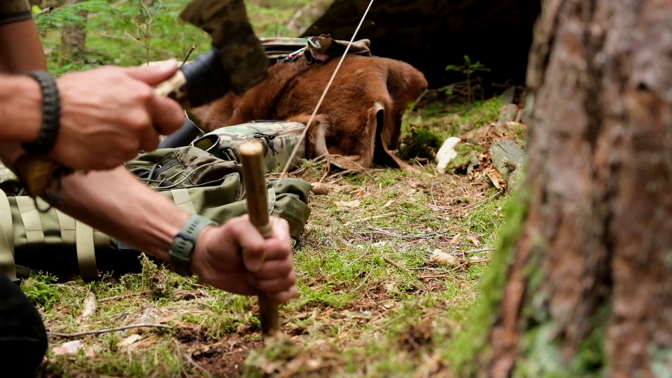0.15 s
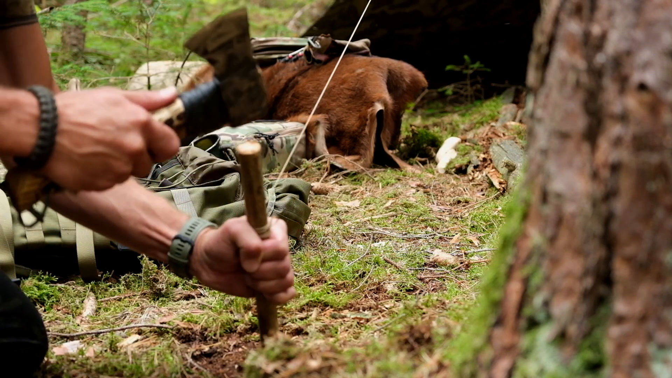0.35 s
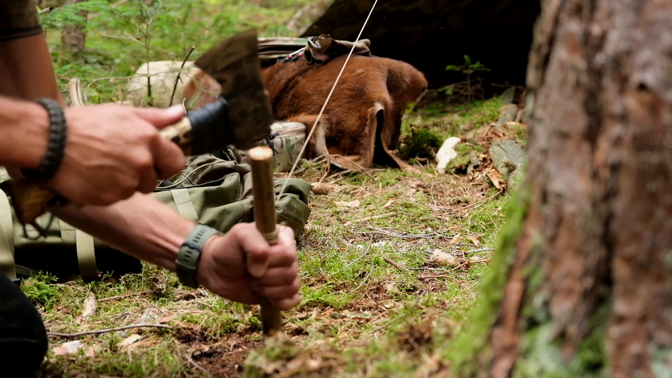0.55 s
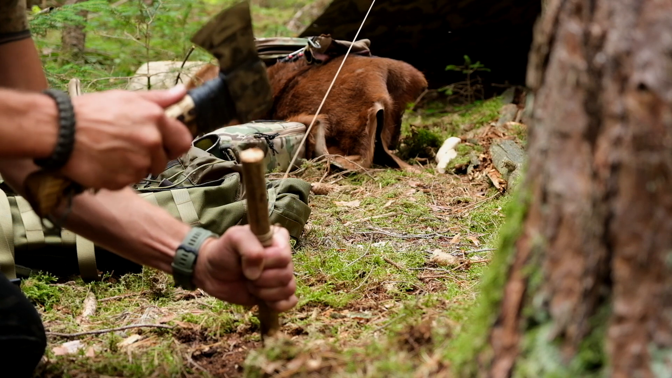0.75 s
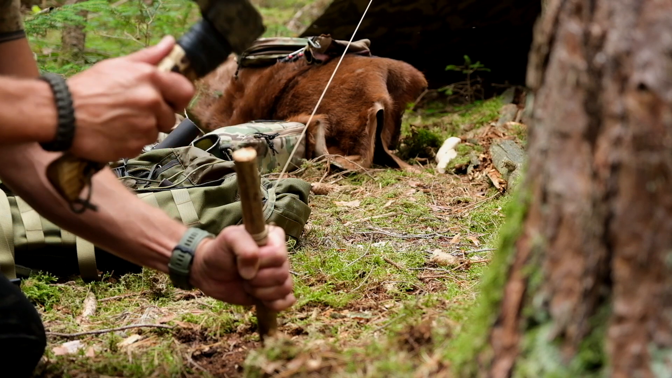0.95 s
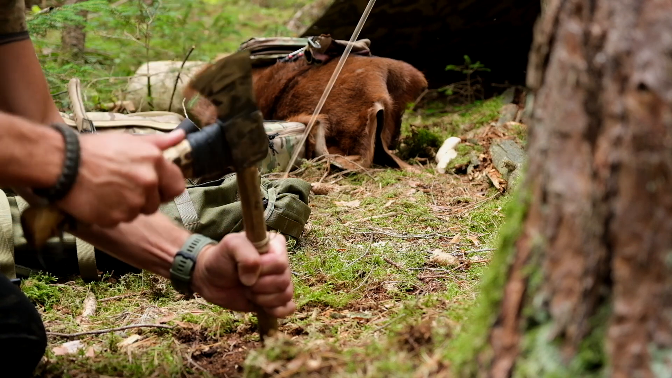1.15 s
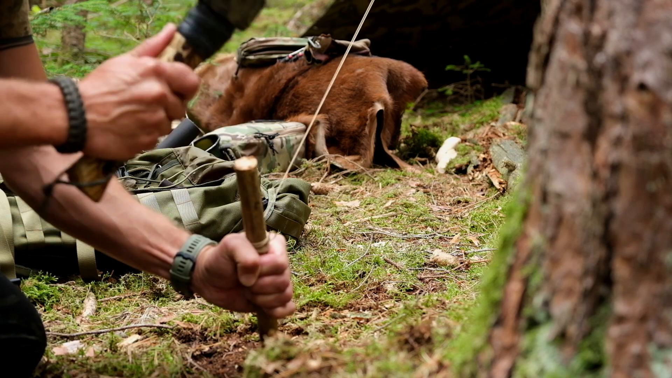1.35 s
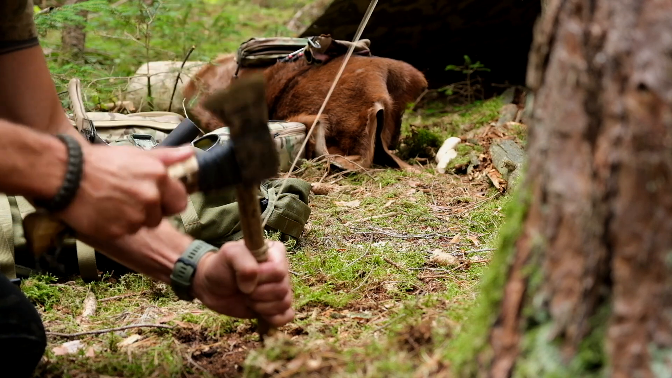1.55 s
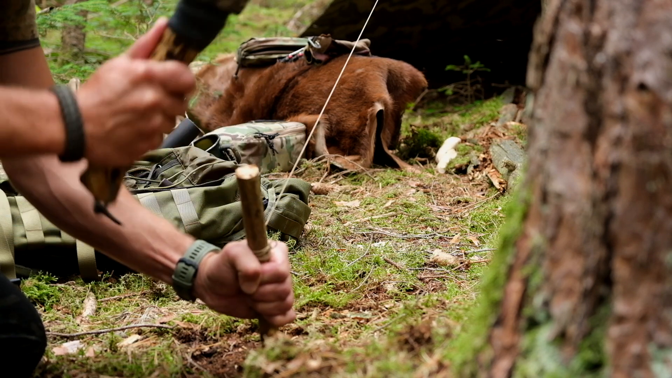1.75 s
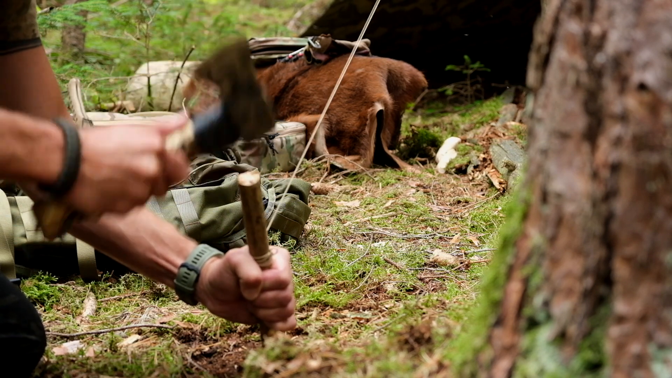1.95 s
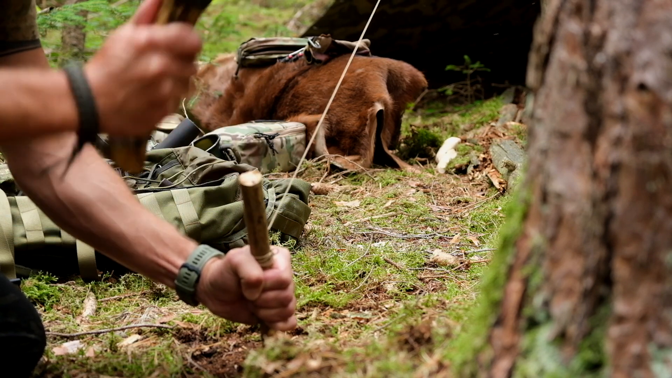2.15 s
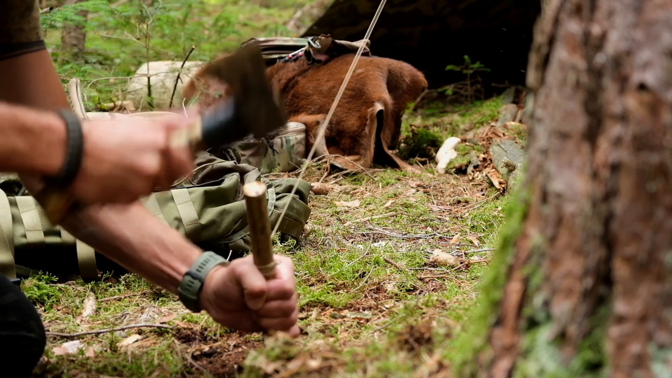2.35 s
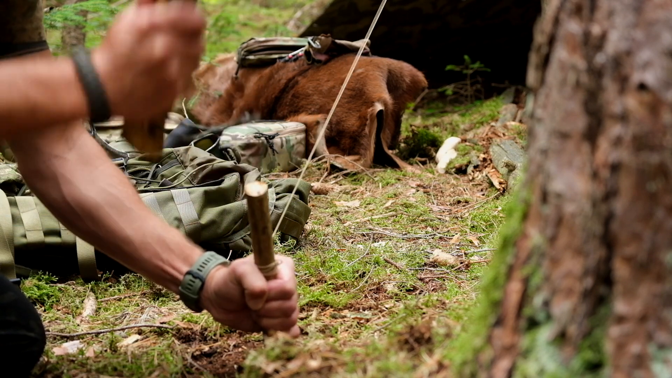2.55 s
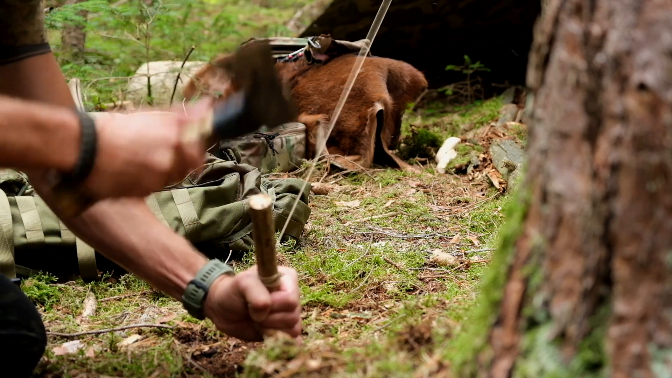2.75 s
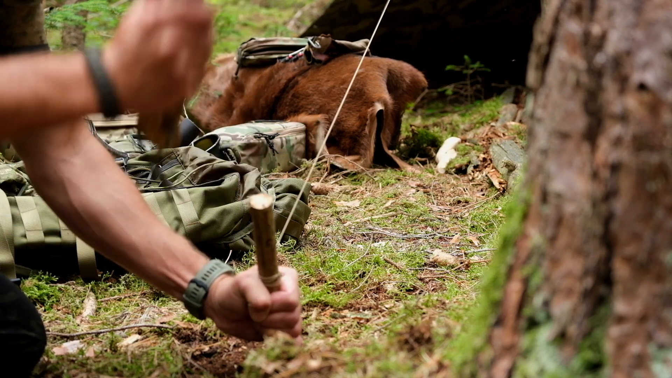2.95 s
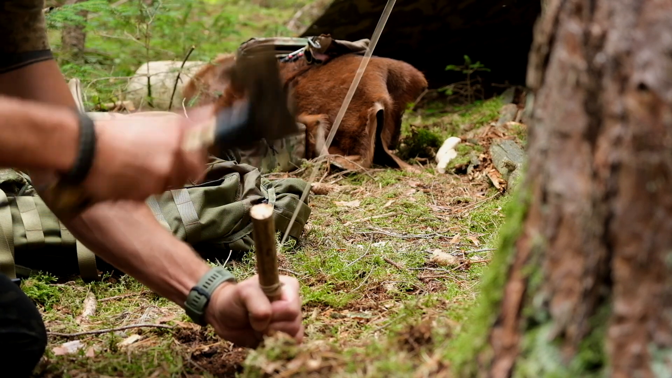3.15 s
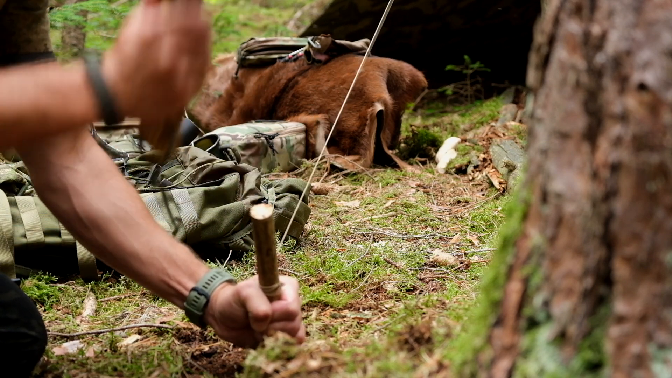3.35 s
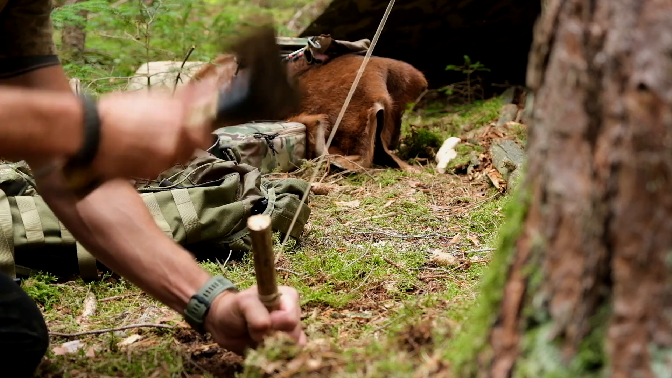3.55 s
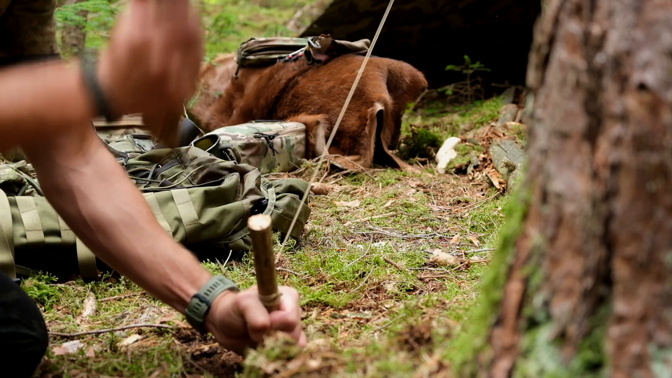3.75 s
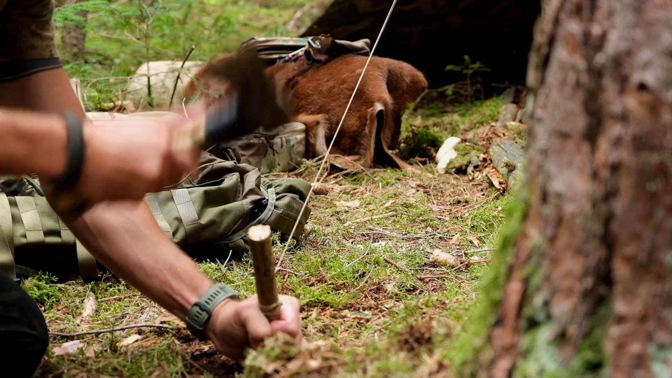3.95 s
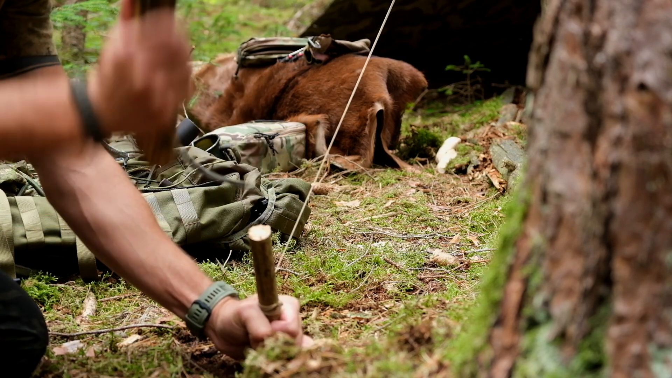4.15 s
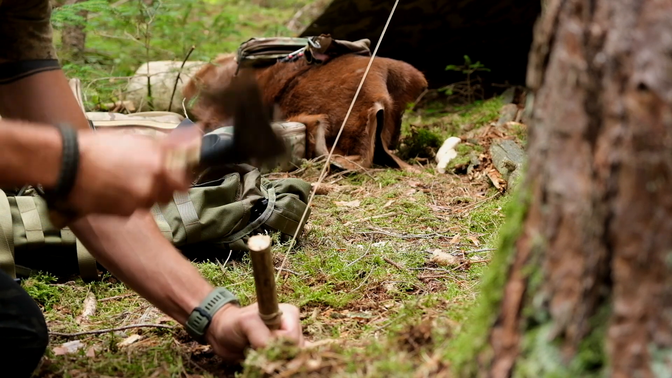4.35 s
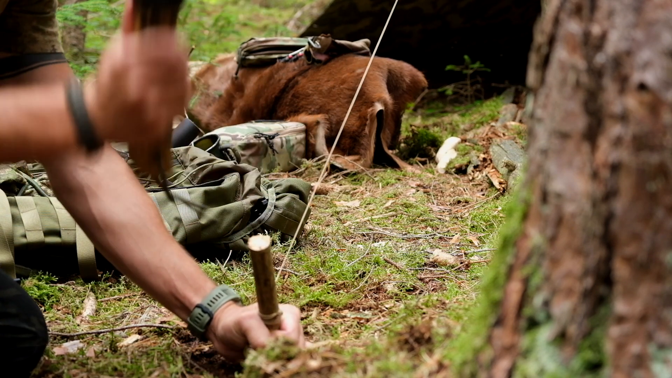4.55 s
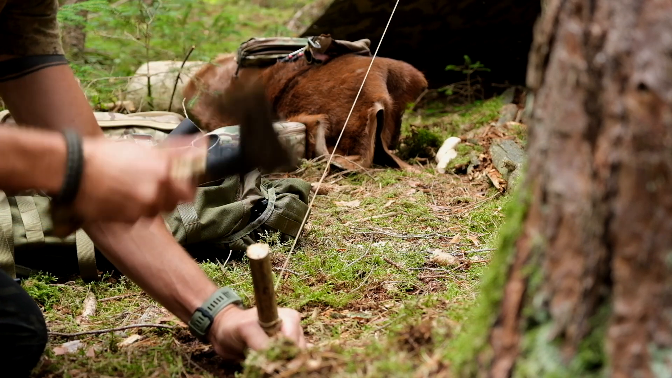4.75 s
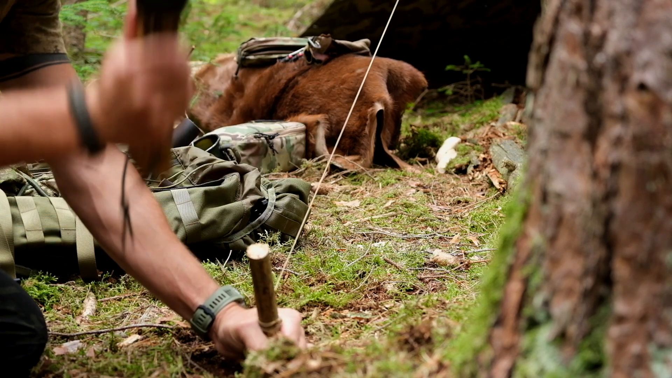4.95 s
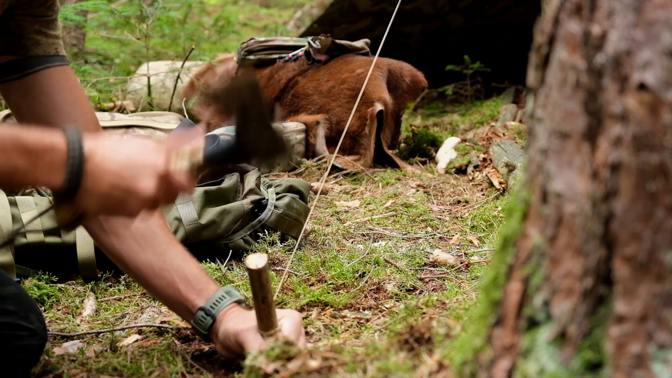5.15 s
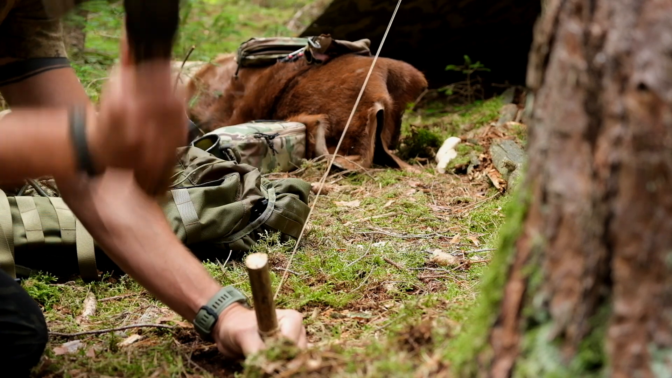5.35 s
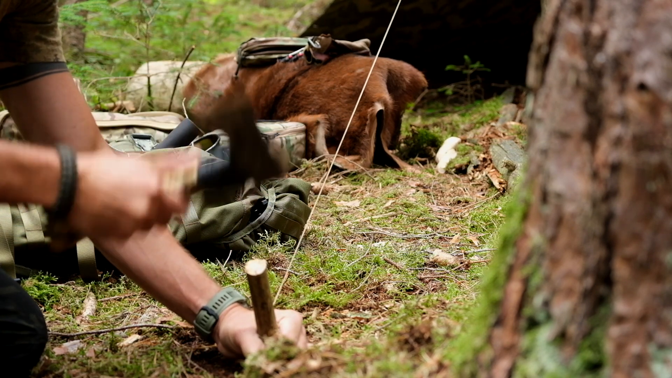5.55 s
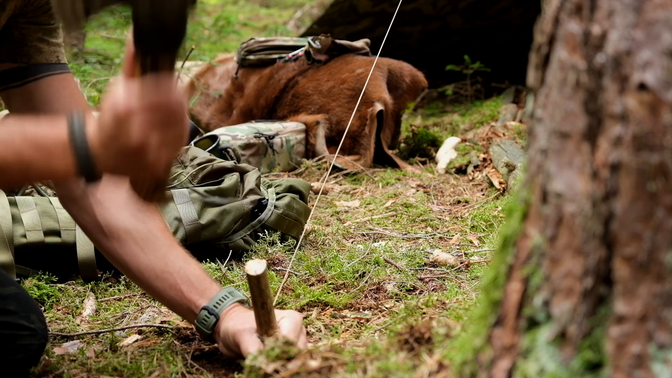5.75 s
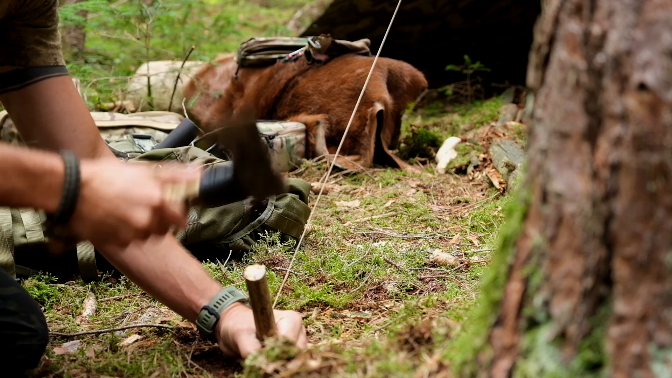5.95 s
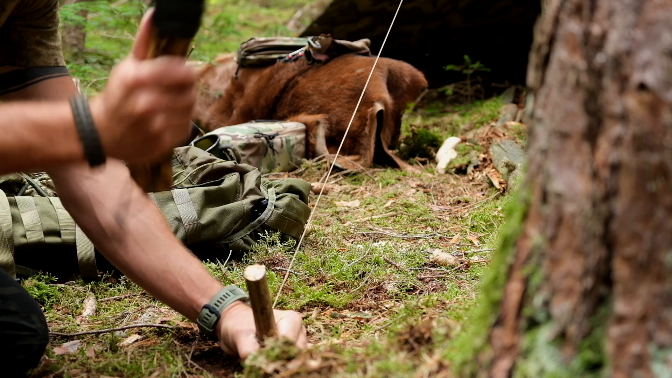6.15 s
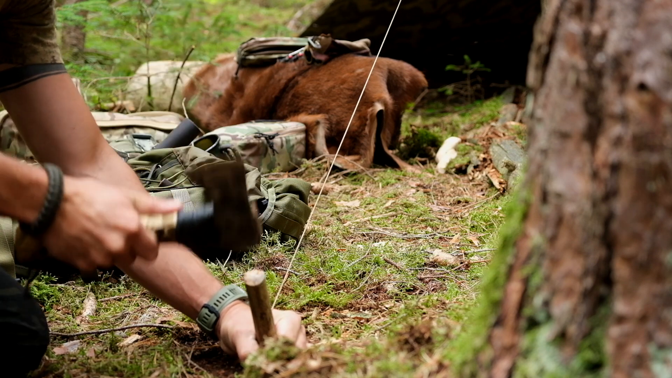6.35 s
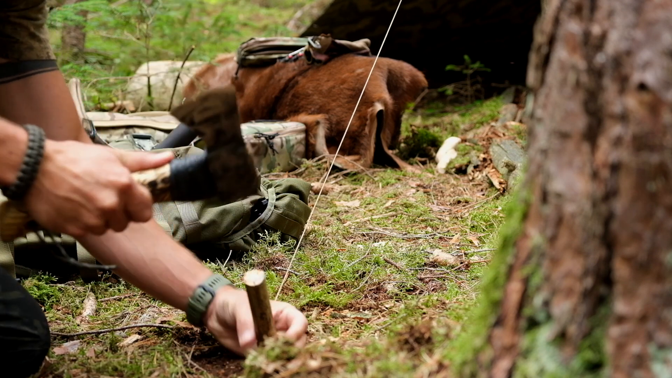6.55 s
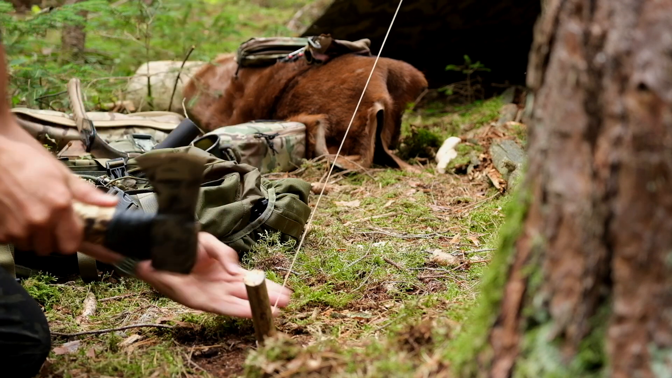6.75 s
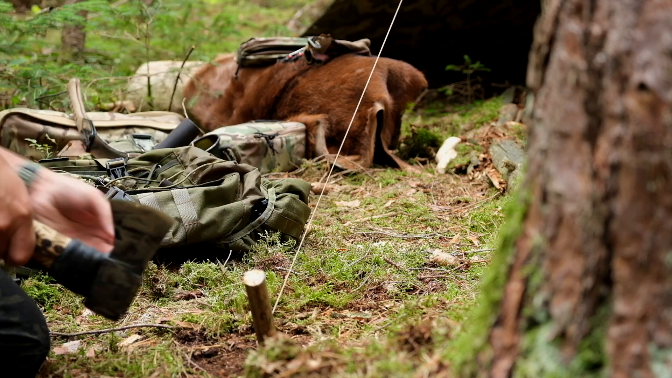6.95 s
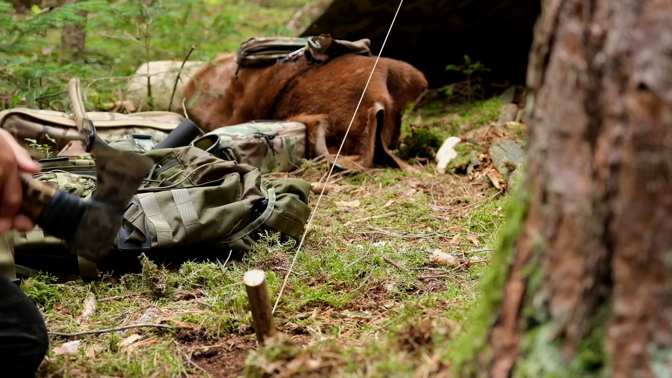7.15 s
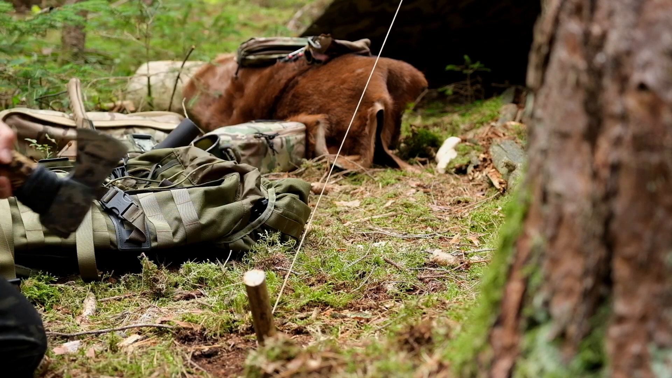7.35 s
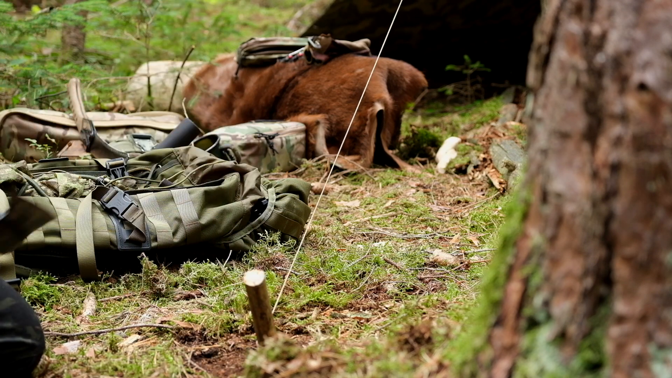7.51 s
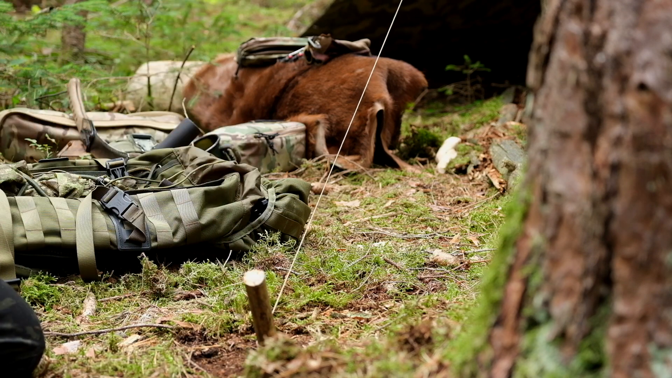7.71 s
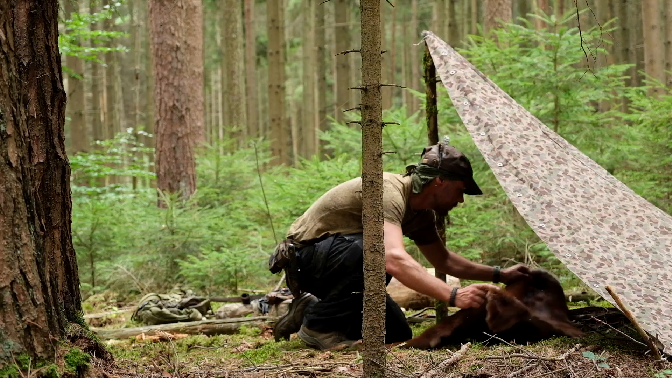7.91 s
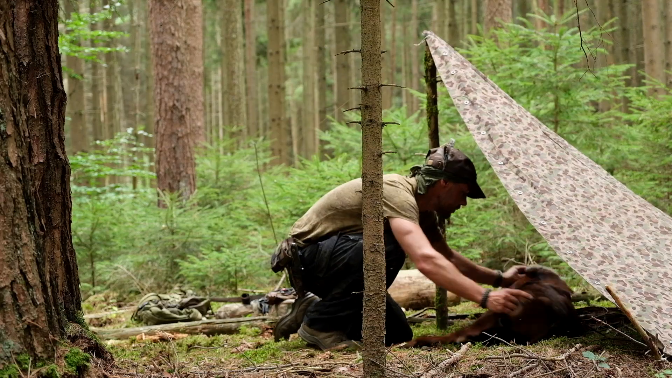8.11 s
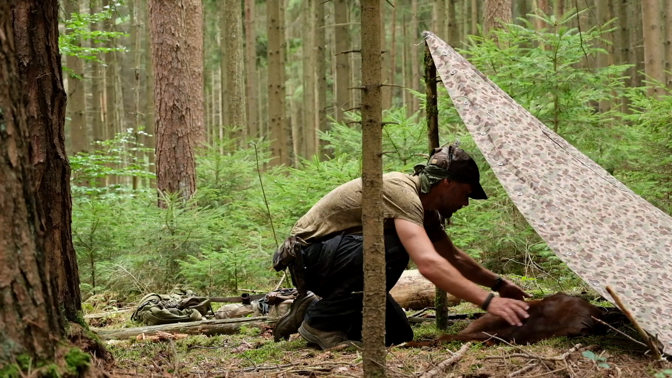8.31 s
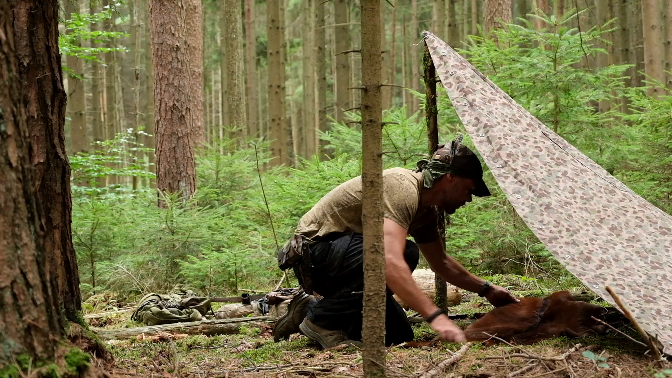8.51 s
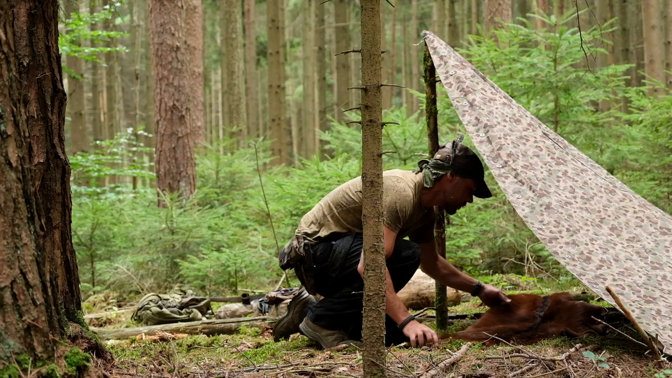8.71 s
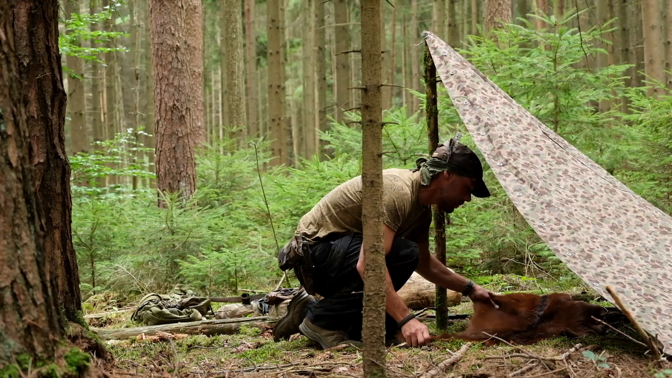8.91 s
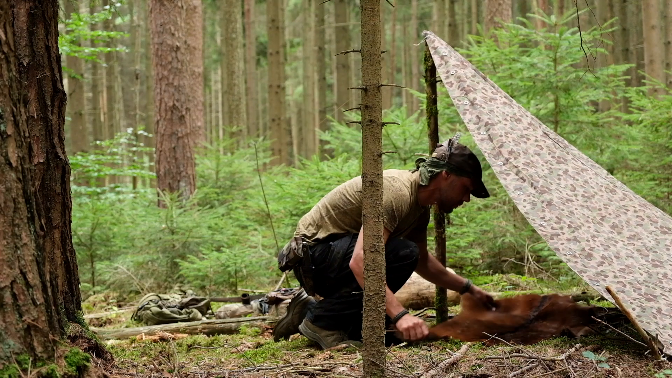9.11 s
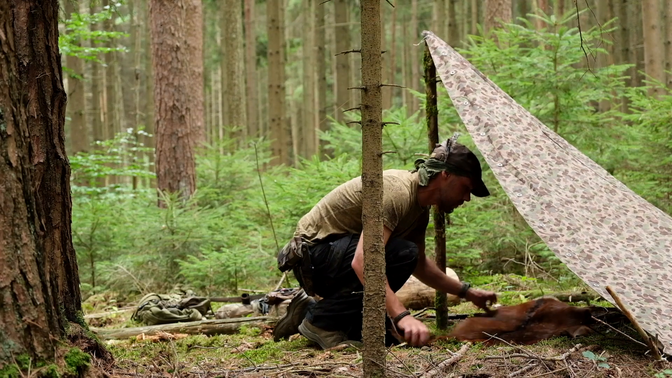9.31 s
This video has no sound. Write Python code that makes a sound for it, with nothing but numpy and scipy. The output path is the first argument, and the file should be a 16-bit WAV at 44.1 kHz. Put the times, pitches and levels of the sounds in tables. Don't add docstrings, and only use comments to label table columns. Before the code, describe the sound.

A still forest clearing: low air rumble, soft hiss, and small high birds chirping far away over a blurred chorus, with a tiny twig tick or two. At about 1.2 and 1.5 seconds the back of a hatchet taps a wooden stake, more lightly and dully. From 1.9 to 6.3 seconds twelve hard blows follow, evenly spaced about 0.4 seconds apart. Each is a very close, dry wooden crack sweeping quickly downward, with a short steel ring and a low thud of soft soil, overloading the microphone and slapping back from nearby trunks. Faint bounces follow a few blows, the last near 6.4. Then quiet returns: thin chirps and short flourishes, slight cloth rustles around 6.6, 7.3 and 8.0, little wind puffs near 8.0 and 8.8, and a distant road hum rising from about 7.8 until the end around 9.4.

```python
import sys
import numpy as np
from scipy import signal
from scipy.fft import rfft, irfft
from scipy.io import wavfile
from scipy.ndimage import uniform_filter1d

SR = 44100
rng = np.random.default_rng(int(sys.argv[2]) if len(sys.argv) > 2 else 0)


def volts(x):
    e = np.asarray(x, float) / 20
    return 10 ** e


def generate_wav(signal):
    frames = np.transpose(np.atleast_2d(signal))
    scaled = np.clip(frames, -1, 1) * 32767
    pcm = np.round(scaled).astype(np.int16)
    wavfile.write(sys.argv[1], SR, pcm)


N = 413658

# pitch_hz, level_db (per Hz)
AIR_SPECTRUM = [(12, -24), (20, 6.5), (113, -9), (216, -6), (301, -10.5), (446, -15.5), (698, -20),
                (1190, -22), (2390, -21.5), (4420, -12.5), (8890, -24.5), (14700, -28.5), (16000, -28.5)]
# pitch_hz, likeness (0 to 1)
STEREO_LIKENESS = [(60, 0.97), (180, 1), (550, 0.83), (1650, 0.66), (4970, 0.67), (15000, 0.1)]
# time_s, level_db
ROAD_LEVEL = [(0, -78), (7.75, -66.5), (7.95, -60), (8.6, -60), (9.38, -58.5)]

# middle_s, level_db, half_length_s
CHORUS_SWELLS = [(0.0, -54, 1), (.95, -67, 0.14), (1.623, -52, 0.21), (2.946, -66, 0.99),
                 (4.002, -52.5, .35), (4.72, -54.5, 0.14), (5.618, -46.5, 0.13), (6.53, -49.5, 0.17),
                 (7.21, -47, 0.092), (7.848, -48.5, .22), (8.576, -57, 0.22), (9.38, -53.5, 0.092)]
HOOK_SHAPE = (.92, .98)
FALL_SHAPE = (1.09, .9)
FLICK_SHAPE = (.85, 1.17)
LEVEL_SHAPE = (1.005, .985)
DIP_SHAPE = (1.05, 1.09)
RISE_SHAPE = (.94, 1.03)
TICK_SHAPE = (1.08, .985)
# start_s, length_s, middle_hz, level_db
HOOKED_NOTES = [(0.0, .033, 5170, -53.5), (0.452, 0.043, 4780, -60), (0.75, 0.067, 5070, -62),
                (0.936, 0.0597, 4790, -63), (1.763, 0.0416, 5204, -54), (2.226, .078, 4345, -64.5),
                (2.862, 0.032, 5000, -57.5), (4.053, 0.032, 4430, -48.5), (5.393, 0.0571, 4930, -52.5),
                (5.642, .06, 2970, -53.5), (6.416, .05, 4653, -51.5), (7.593, .053, 4910, -57.5),
                (8.548, 0.0604, 4925, -53.5)]
# start_s, length_s, middle_hz, level_db
FALLING_NOTES = [(.236, .075, 3764, -55.5), (.285, 0.12, 3057, -52.5), (.8, 0.065, 3800, -60.5),
                 (2.507, 0.066, 5600, -62), (3.63, .03, 5960, -58.5), (4.09, 0.058, 3866, -59),
                 (6.057, 0.085, 2940, -60), (7.72, 0.075, 4030, -60.5), (8.922, .071, 6050, -50.5),
                 (8.99, 0.075, 4807, -61), (9.12, 0.061, 5620, -62.5), (9.305, .074, 3090, -65)]
# start_s, length_s, middle_hz, level_db
FLICKED_NOTES = [
    (1.816, .018, 5900, -54),
    (4.038, .022, 4895, -46.5),
    (9.295, .022, 4940, -52),
]
# start_s, length_s, middle_hz, level_db
HELD_NOTES = [(.138, .058, 4670, -68), (.164, .13, 2490, -56.5), (.22, .022, 5160, -57),
              (.362, 0.024, 7840, -54.5), (1.038, .02, 4720, -59), (2.855, .04, 6383, -55.5),
              (2.92, .1, 4920, -59.5), (2.927, 0.12, 5760, -61.5), (3.598, .02, 3610, -56.5),
              (5.79, .064, 5330, -57.5), (6.215, .11, 2570, -65), (6.651, .093, 3140, -65.5),
              (7.14, .043, 5230, -58.5), (7.208, 0.0495, 5360, -52.5), (7.26, 0.087, 2086, -65),
              (8.424, 0.054, 2890, -66.5), (8.7, 0.068, 7820, -56.5), (9.174, .085, 4640, -61),
              (9.195, .095, 2470, -64), (9.315, 0.046, 5350, -60.5)]
# start_s, length_s, middle_hz, level_db
RISING_NOTES = [
    (4.857, .051, 7800, -56.5),
    (4.953, 0.057, 6004, -49.5),
    (7.065, .037, 6300, -60.5),
]
# after_s, length_s, middle_hz, level_db
FLOURISH_PARTS = [
    (0, 0.029, 4340, 0.5),
    (.03, 0.025, 3248, 1),
    (0.069, .04, 3111, -1),
]
# start_s, level_db, pitch_factor
FLOURISHES = [
    (1.831, -54, 1),
    (6.509, -55.5, 1),
    (7.855, -62.5, 1.03),
    (8.672, -51, 1),
]

# start_s, peak_db, pitch_hz, t60_s
TWIGS = [(.049, -26.5, 5400, 0.0092), (.222, -43, 6700, .004), (1.5515, -22, 6060, 0.018),
         (4.545, -41, 700, 0.012), (5.03, -44, 1510, 0.015), (5.4405, -29, 4313, 0.0055),
         (5.873, -45.5, 1070, 0.043), (5.936, -33, 749, 0.0118), (6.094, -46, 550, 0.025),
         (6.52, -48, 599.5, 0.02), (7.845, -49.5, 2000, 0.0057)]
# middle_s, level_db, half_length_s
RUSTLES = [
    (6.6, -58, .035),
    (7.3, -63, .05),
    (8.03, -68, .06),
]
# start_s, level_db, signed_length_s (the sign is the push direction)
WIND_PUFFS = [
    (8.017, -37, -0.0023),
    (8.036, -36, 0.0019),
    (8.112, -35, -0.0034),
    (8.783, -36.5, .003),
]

# delay_s, level_db, smear_s
ECHOES = [
    (0.0164, -17, .0002),
    (.021, -30, .004),
    (0.034, -41, .004),
    (0.0513, -36.5, .0015),
    (0.06, -38.5, .004),
]
# pitch_hz, level_db
ECHO_COLOUR = [(300, -22), (1400, -12), (2800, 1), (4000, -3), (6000, -12), (8000, -11), (15000, -22)]
# pitch_hz, t60_s
WOODS_DECAY = [(150, 0.3), (600, 0.33), (2000, 1), (4500, 0.65), (9000, 0.04), (16000, .2)]
# pitch_hz, level_db
WOODS_COLOUR = [(100, -8), (500, -4.5), (2000, -6), (5000, -9.5), (9000, 12.5), (16000, -3.5)]

CONTACT_TIMES = [1.1886, 1.5434, 1.9199, 2.3138, 2.7101, 3.1084, 3.5008, 3.8988, 4.302, 4.7042, 5.102,
                 5.4958, 5.9033, 6.3228, 2.7485, 3.542, 5.1413, 6.383]
# level_db, stake_hz, hardness_db_per_octave, soil_hz, soil_db
BLOWS = [(-8, 1100, -1, 460, -28), (-6.5, 1100, -3.0, 240, -18), (2, 2120, -3.5, 240, -11.5),
         (4, 2000, 0.23, 205, -10), (4.5, 1920, 1, 240, -9), (6, 2320, -0.37, 260, -7),
         (4.5, 1970, -0.6, 270, -6.5), (6, 2340, -0.38, 245, -10.5), (6, 1900, -0.4, 256, -10.5),
         (4.5, 2230, 0.12, 270, -8), (3.5, 1900, 0.27, 300, -8), (4, 1800, -0.2, 177, -7),
         (4.5, 2030, -0.16, 185, -5.5), (3.5, 2090, 0.83, 175, -8)]
# level_db, stake_hz, hardness_db_per_octave, soil_hz, soil_db
BOUNCES = [
    (-26.5, 1250, -5, 245, -15.5),
    (-36, 2200, -7.5, 274, -14),
    (-22.5, 1680, -1, 236, -13.5),
    (-41, 690, -3, 340, -19.5),
]
# pitch_hz, level_db
KNOCK_SPECTRUM = [(150, -19.5), (500, -17.5), (1100, -5.5), (2000, 1), (3200, 0), (4400, -0.5),
                  (5800, -9.5), (8000, -7.5), (11000, -30.5), (16000, -22)]
# pitch_multiple, level_db, t60_s
STAKE_MODES = [(.23, -22.5, .022), (0.452, -20, .012), (.7, -10, 0.0093), (0.998, -2, 0.0054),
               (1.4, -11, 0.0033), (1.85, -11, 0.0054)]
# pitch_hz, level_db, t60_s
HEAD_MODES = [(2007, -17, 0.027), (2812, -15, 0.026), (4276, -4.5, 0.01), (4630, -13, 0.015),
              (6670, -17.5, 0.012), (8260, -18, 0.021), (10800, -26.5, 0.0046), (13070, -33, 0.01)]
# pitch_hz, level_db, t60_s
SOIL_SWAY = (133, -10.5, .13)


def evened(x):
    return x / np.sqrt(np.mean(x ** 2) + 1e-20)


def read(points, hz):
    f, value = np.transpose(points)
    return np.interp(np.log(hz + 1), np.log(f + 1), value)


def add(mix, start_s, sound):
    part = mix[round(start_s * SR):][:len(sound)]
    part += sound[:len(part)]


def coloured(x, points):
    size = x.shape[-1]
    gain = volts(read(points, np.fft.rfftfreq(size, 1 / SR)))
    return irfft(rfft(x) * gain, size)


def woods_tail(colour, start_s, t60_scale):
    taps = np.zeros((2, SR))
    at = np.arange(round(start_s * SR), SR - 20, 20)
    at = at + rng.integers(0, 20, (2, len(at)))
    np.put_along_axis(taps, at, rng.choice([-1., 1.], at.shape), 1)
    hz, t, z = signal.stft(taps, SR, nperseg=256)
    t60 = t60_scale * read(WOODS_DECAY, hz)[:, None]
    z = z * volts(read(colour, hz)[:, None] - 60 * t / t60)
    out = signal.istft(z, SR, nperseg=256)[1]
    return out / np.linalg.norm(out[0])


def air():
    frames, hz = N // 256 + 5, np.fft.rfftfreq(1024, 1 / SR)
    a, b, c, d, patches = rng.standard_normal((frames, 513, 5)).T
    patches = uniform_filter1d(patches, size=10, axis=0)
    patches = evened(uniform_filter1d(patches, size=16, axis=1))
    same = np.clip(read(STEREO_LIKENESS, hz), -1, 1)[:, None]
    left = a + 1j * b
    right = same * left + np.sqrt(1 - same ** 2) * (c + 1j * d)
    lumpy_db = read([(60, 3.0), (400, 1.4), (3000, .5)], hz)[:, None] * patches
    z = np.array([left, right]) * volts(read(AIR_SPECTRUM, hz)[:, None] + lumpy_db)
    still = signal.istft(z, nperseg=1024, noverlap=768)[1][:, :N]
    return volts(-50.5) * evened(still)


def distant_road():
    road = rng.standard_normal(N) + .3 * rng.standard_normal((2, N))
    road = coloured(road, [(300, -25.5), (600, -4.5), (950, 5.5), (1500, -1.5), (2500, -17.0), (5000, -45.0)])
    time_s, level_db = np.transpose(ROAD_LEVEL)
    return evened(road) * volts(np.interp(np.arange(N) / SR, time_s, level_db))


def whistle(length_s, start_hz, middle_hz, end_hz, level_db):
    u = np.linspace(0, 1, round(length_s * SR) + 2)
    hz = np.polyval(np.polyfit([0, .5, 1], [start_hz, middle_hz, end_hz], deg=2), u)
    trill = .55 if 3110 < middle_hz < 5600 else .2
    hz *= 1 + trill * uniform_filter1d(rng.standard_normal(len(u)), size=150)
    flutter_db = 70 * trill * uniform_filter1d(rng.standard_normal(len(u)), size=200)
    tone = np.sin(2 * np.pi * np.cumsum(hz) / SR)
    return volts(level_db + 6 + flutter_db) * tone * np.sin(np.pi * u) ** 0.44


def bird_chorus():
    chorus, t = np.zeros(N), np.arange(N) / SR
    for s, a, b, c in rng.random((900, 4)):
        hz = 4494 * np.exp(.4 * (a - .5) + .2 * (b - c))
        add(chorus, 9.3 * s, whistle(0.022 + .06 * b, hz, hz * (.95 + 0.089 * c), hz * (0.57 + .25 * c), 4 * c))
    woods = woods_tail([(100, 0.0), (16000, 0)], .002, 0.28)
    chorus = signal.fftconvolve(chorus[None], woods, axes=1)[:, :N]
    swell = volts(-64)
    for middle_s, level_db, half_s in CHORUS_SWELLS:
        swell = swell + volts(level_db) * np.exp(-((t - middle_s) / half_s) ** 2)
    shared = evened(chorus + 0.77 * chorus[::-1])
    return shared * swell * volts(-7.0)


def songbook():
    ticks = [(4.137 + k * .103, .022, 5900, -61.5) for k in range(6)]
    shaped = [(HOOK_SHAPE, HOOKED_NOTES), (FALL_SHAPE, FALLING_NOTES), (FLICK_SHAPE, FLICKED_NOTES),
              (LEVEL_SHAPE, HELD_NOTES), (RISE_SHAPE, RISING_NOTES), (TICK_SHAPE, ticks)]
    for s, db, pitch in FLOURISHES:
        for shape, part in zip((HOOK_SHAPE, DIP_SHAPE, RISE_SHAPE), FLOURISH_PARTS):
            after, length, hz, part_db = part
            shaped.append((shape, [(s + after, length, hz * pitch, db + part_db)]))
    notes = []
    for (start, end), rows in shaped:
        for s, length, hz, db in rows:
            notes.append((s, length, start * hz, hz, end * hz, db))
    return notes


def clear_birds():
    direct, notes = np.zeros((2, N)), songbook()
    for (s, *note), side in zip(notes, rng.uniform(-0.85, 1, len(notes))):
        sound = whistle(*note)
        add(direct[0], s, sound * volts(8.8 * side))
        add(direct[1], s, sound / volts(1.8 * side))
    woods = woods_tail([(2600, -12), (3600, 0), (5600, 0), (6200, -6)], .002, .4)
    blur = signal.fftconvolve(direct.mean(0)[None], woods, axes=1)[:, :N]
    return volts(-0.5) * direct + volts(-6.5) * blur


def twig_ticks():
    out, t = np.zeros(N), np.arange(2000) / SR
    for s, db, hz, t60 in TWIGS:
        snap = coloured(rng.standard_normal(len(t)), [(0.24 * hz, -18), (hz, 0), (1.6 * hz, -10), (9 * hz, -30)])
        add(out, s, volts(db - 1.5 - 60 * t / t60) * evened(snap))
    return out


def cloth_rustle():
    out, t = np.zeros(N), np.arange(N) / SR
    fizz = coloured(rng.standard_normal(N), [(3000, -32), (7000, -1), (11000, -3.5), (16000, -12.0)])
    fizz = evened(fizz)
    for middle_s, db, half_s in RUSTLES:
        out += volts(db) * fizz * np.exp(-((t - middle_s) / half_s) ** 2)
    return out


def wind_puffs():
    out, t = np.zeros(N), np.arange(2000) / SR
    for s, db, length_s in WIND_PUFFS:
        u = t / abs(length_s)
        add(out, s, np.sign(length_s) * volts(db + 8.5) * u * (1 - 0.29 * u) * np.exp(-u))
    return out


def ring(t, hz, level_db, t60, rise_s, phase):
    t = np.maximum(t, 0)
    envelope = volts(level_db - 60 * t / t60) * (1 - np.exp(-t / rise_s))
    return envelope * np.sin(2 * np.pi * (hz * t + phase))


def soil_thud(t, soil_hz, soil_db, luck):
    sway_hz, sway_db, sway_t60 = SOIL_SWAY
    soil = ring(t - .55 / soil_hz, soil_hz, soil_db + 9, 5.62 / soil_hz, 0.83 / soil_hz, 0)
    soil += ring(t - .004, sway_hz * (.92 + 0.13 * luck), soil_db + sway_db, sway_t60, 0.0098, 0)
    crumbs = coloured(rng.standard_normal(len(t)), [(70, -27.5), (150, 11.5), (300, 3.5), (600, -15.5), (1500, -34.5)])
    soil += evened(crumbs) * volts(soil_db - 9.5 - 60 * t / 0.092) * (1 - np.exp(-t / .004))
    return soil


def blow(row, luck):
    blow_db, stake_hz, hardness, soil_hz, soil_db = row
    t, hz = np.arange(8192) / SR, np.fft.rfftfreq(8192, 1 / SR) + 1
    tilt_db = 2.4 * hardness * np.log2(np.maximum(hz / stake_hz, .5))
    contact = volts(read(KNOCK_SPECTRUM, hz * min(2000 / stake_hz, 1.6)) + tilt_db)
    spread = np.clip(0.82 + .12 * hardness, .3, 1.1)
    contact = contact * np.exp(-2j * np.pi * spread * (.18 * np.sqrt(hz) - 0.000822 * hz))
    returned = np.clip(.55 + .14 * hardness, .1, .7)
    trips = 1 / (1 + returned * np.exp(-1j * np.pi * hz / stake_hz))
    sweep, single = irfft(contact * np.array([trips, 1 + 0 * hz])) * (t < .03)
    splinter = evened(irfft(rfft(rng.standard_normal(len(t))) * abs(contact)))
    pressed = volts(-0.5 + 2.2 * min(hardness + 1, 0)) * np.exp(-(t / 0.0017) ** 4)
    splinter *= (pressed + volts(-10.5 - 60 * t / 0.025)) * (1 - np.exp(-t / 0.00014))
    knock = volts(7) * sweep / abs(sweep).max() + splinter
    outward = volts(8.0) * single / abs(single).max() + 0.19 * splinter
    modes = [(k * stake_hz, db, t60) for k, db, t60 in STAKE_MODES] + HEAD_MODES
    for (mode_hz, db, t60), (a, b, c) in zip(modes, luck):
        late_s = max(0.0633 / np.sqrt(mode_hz) - .0006, 0)
        mode_db = db + 3.0 + 0.78 * hardness * np.log2(mode_hz / stake_hz) + 5.7 * (a - .5)
        knock += ring(t - late_s, mode_hz * (1 + 0.011 * (b - .5)), mode_db, t60, 0.000067, c)
    soil = soil_thud(t, soil_hz, soil_db, luck[0, 1])
    return volts(blow_db - 3.0) * knock, volts(blow_db - 4.5) * outward, soil


def trunk_echoes(outward):
    trunks, t = np.zeros(8192), np.arange(900) / SR
    for delay_s, db, smear_s in ECHOES:
        bark = rng.standard_normal(len(t)) * np.exp(-t / smear_s)
        add(trunks, delay_s, volts(db) * bark / np.linalg.norm(bark))
    return signal.oaconvolve(outward, coloured(trunks, ECHO_COLOUR))[:N]


def forest_reverb(groups):
    far = np.zeros((2, N))
    for outward in groups:
        woods = woods_tail(WOODS_COLOUR, .006, 1)
        close = woods[::-1] * volts(14.5 - 60 * np.arange(woods.shape[1]) / SR / 0.15)
        woods = woods + close
        woods = 0.91 * woods.mean(0) + 0.066 * woods
        far += signal.oaconvolve(outward[None], woods, axes=1)[:, :N]
    return volts(-29) * far


def hammering():
    knocks, groups, soils = np.zeros(N), np.zeros((3, N)), np.zeros(N)
    rows = BLOWS + BOUNCES
    for k, (row, luck) in enumerate(zip(rows, rng.random((len(rows), 16, 3)))):
        knock, outward, soil = blow(row, luck)
        add(knocks, CONTACT_TIMES[k], knock)
        add(groups[k % 3], CONTACT_TIMES[k], outward)
        add(soils, CONTACT_TIMES[k], soil)
    soils = signal.sosfilt(signal.butter(2, 85, "high", fs=SR, output="sos"), soils)
    return knocks + soils + trunk_echoes(groups.sum(0)) + forest_reverb(groups)


def scene():
    background = air() + distant_road() + bird_chorus() + clear_birds()
    return background + twig_ticks() + cloth_rustle() + wind_puffs() + hammering()


def low_pass(x):
    return signal.sosfilt(signal.butter(12, 15800, fs=SR, output="sos"), x)


def record(dry):
    overloaded = np.clip(dry, -.99, .99)
    return low_pass(overloaded)


dry = scene()
out = record(dry)
generate_wav(out)
```